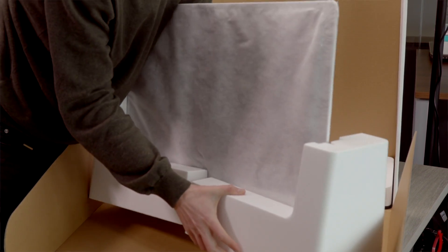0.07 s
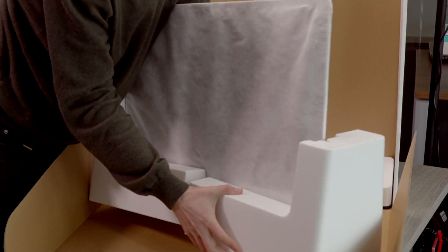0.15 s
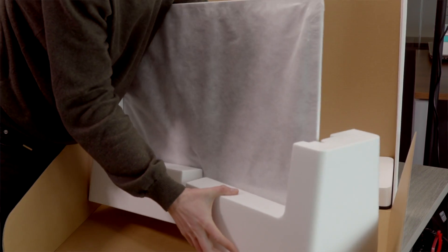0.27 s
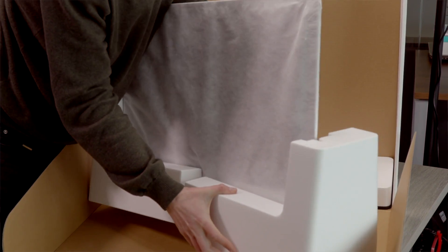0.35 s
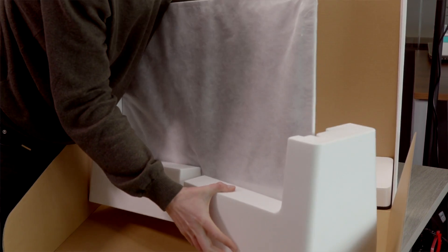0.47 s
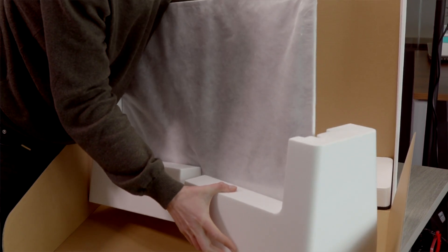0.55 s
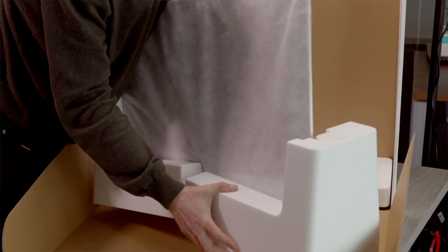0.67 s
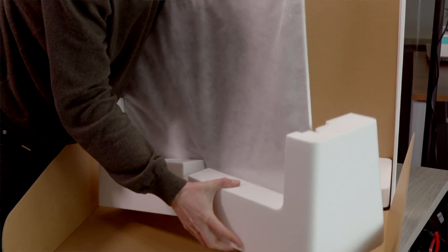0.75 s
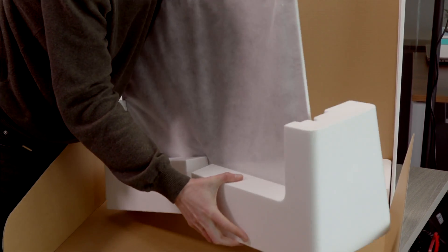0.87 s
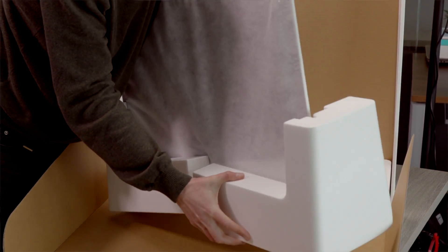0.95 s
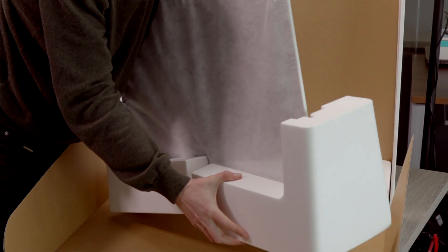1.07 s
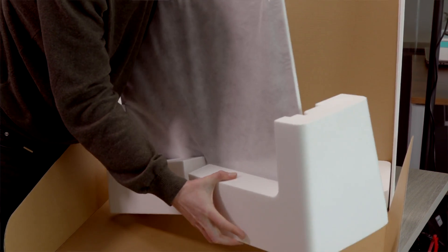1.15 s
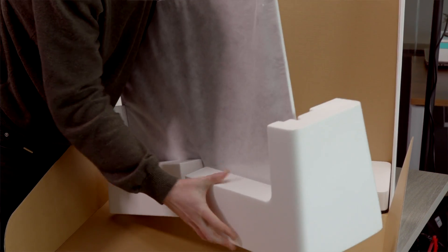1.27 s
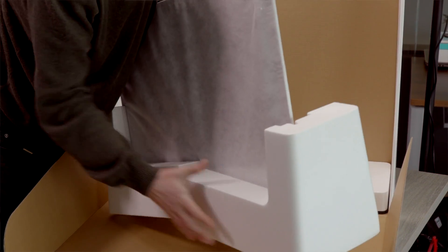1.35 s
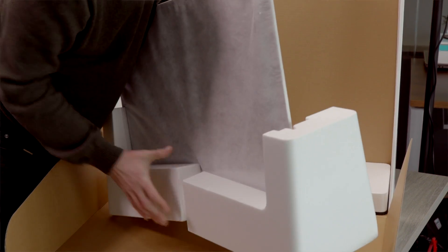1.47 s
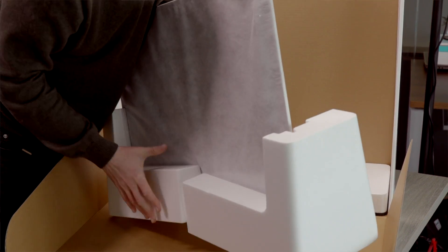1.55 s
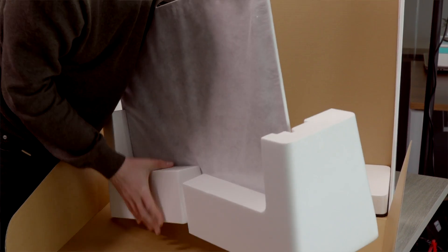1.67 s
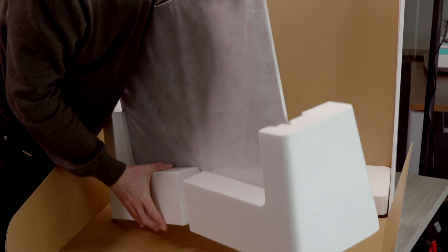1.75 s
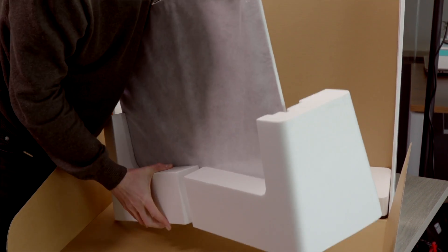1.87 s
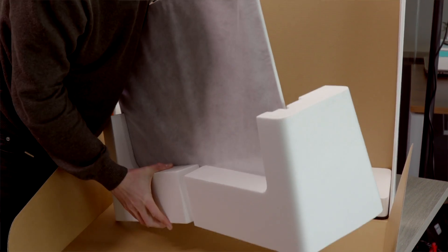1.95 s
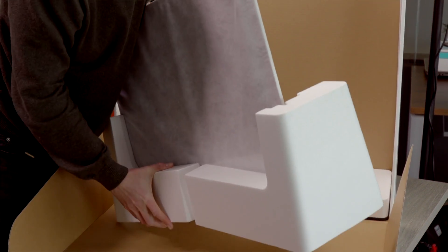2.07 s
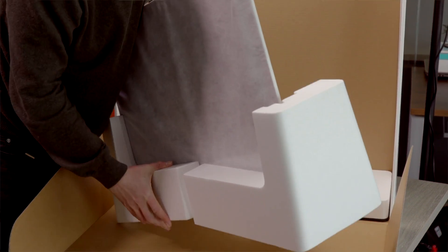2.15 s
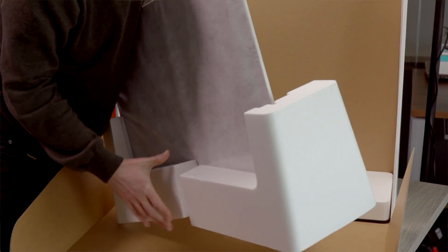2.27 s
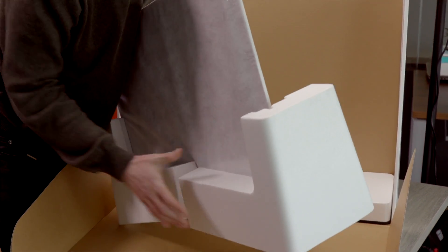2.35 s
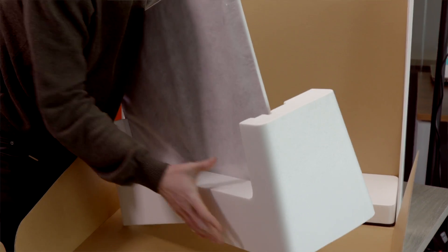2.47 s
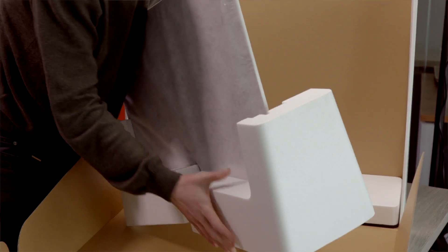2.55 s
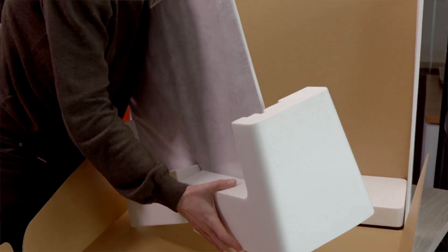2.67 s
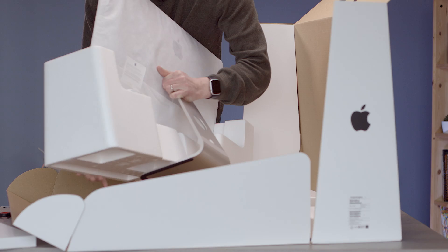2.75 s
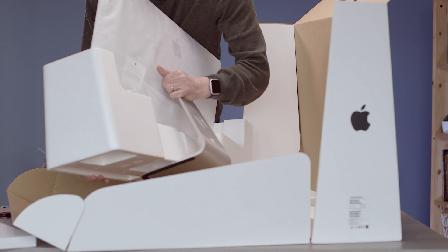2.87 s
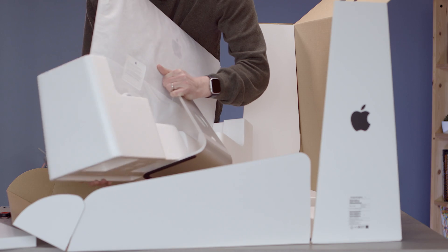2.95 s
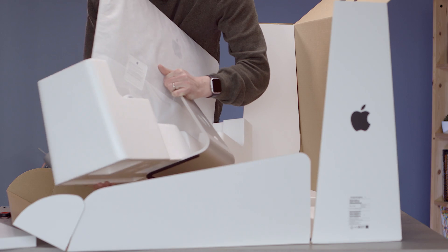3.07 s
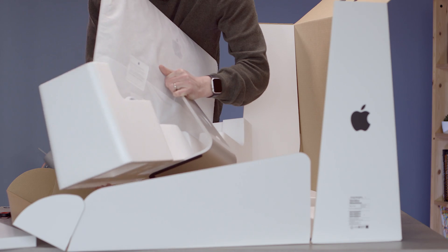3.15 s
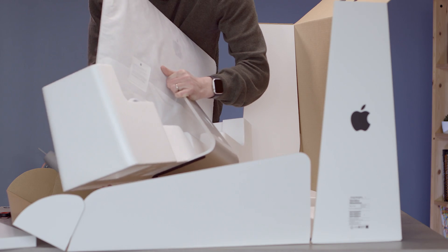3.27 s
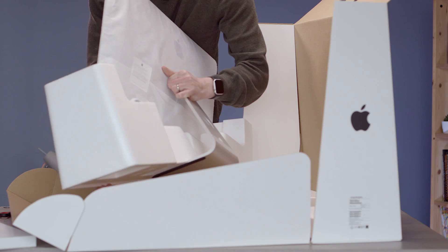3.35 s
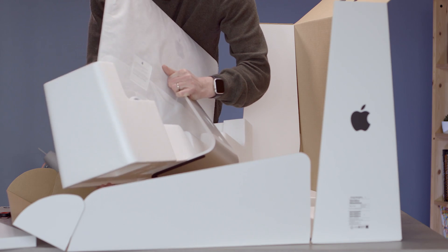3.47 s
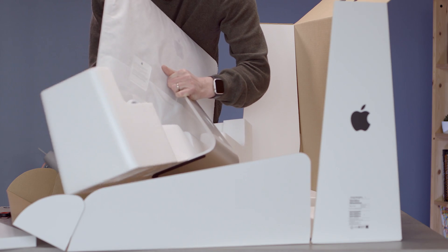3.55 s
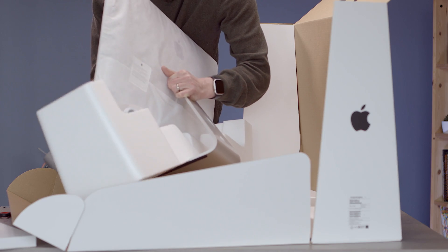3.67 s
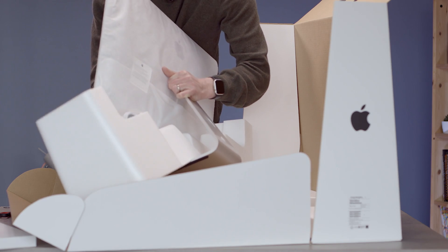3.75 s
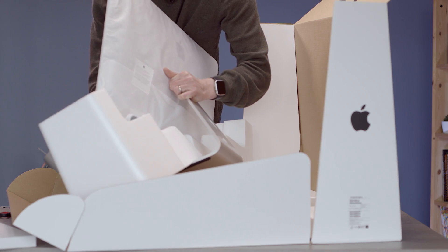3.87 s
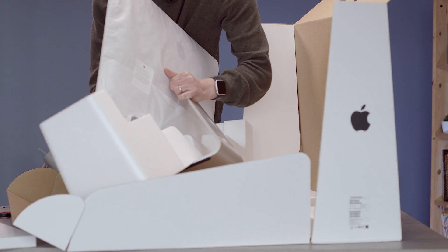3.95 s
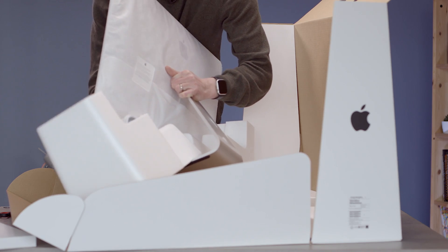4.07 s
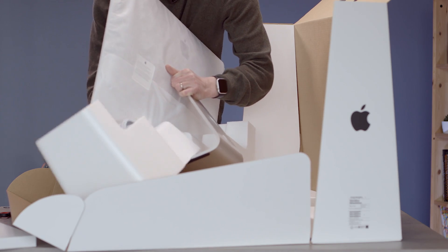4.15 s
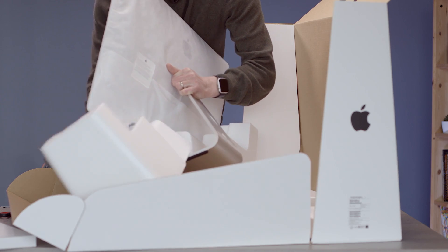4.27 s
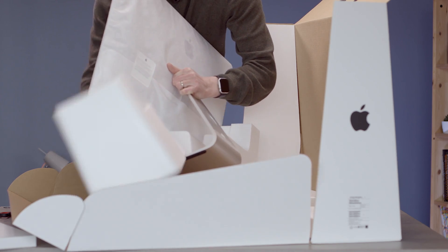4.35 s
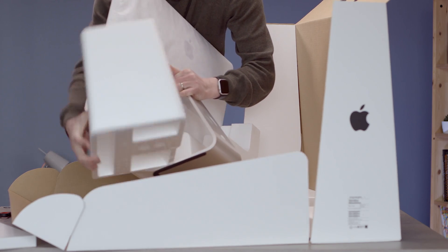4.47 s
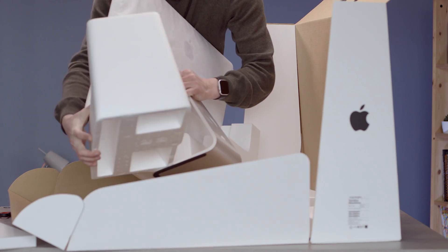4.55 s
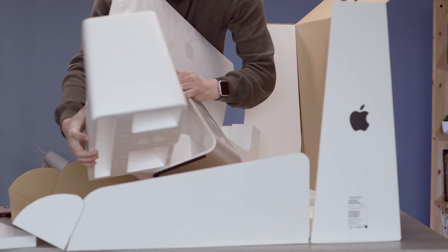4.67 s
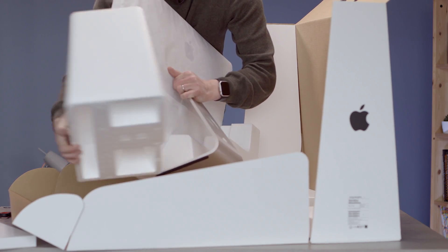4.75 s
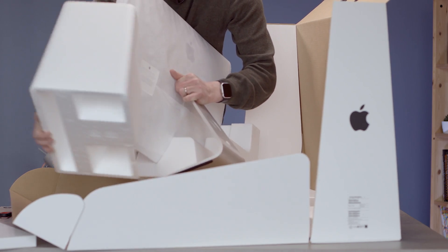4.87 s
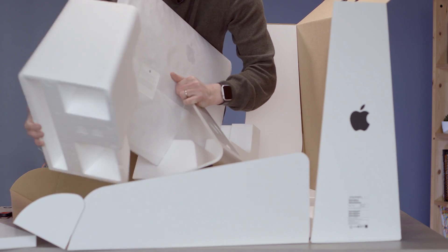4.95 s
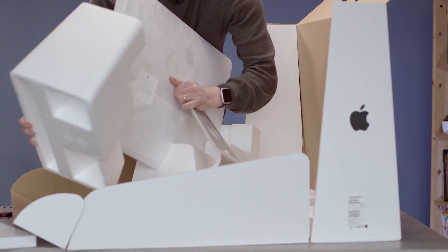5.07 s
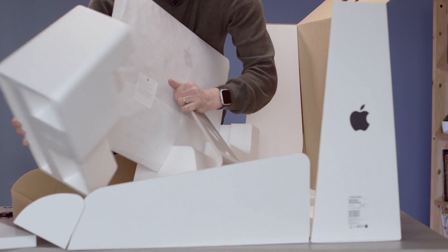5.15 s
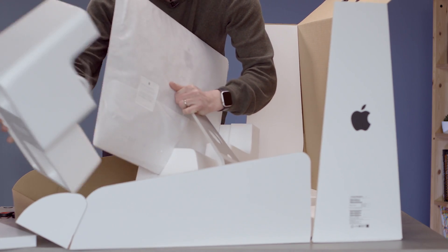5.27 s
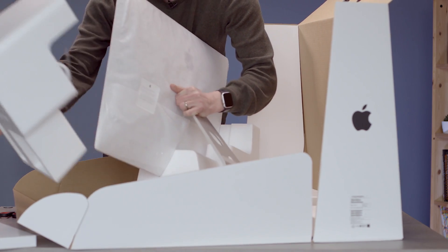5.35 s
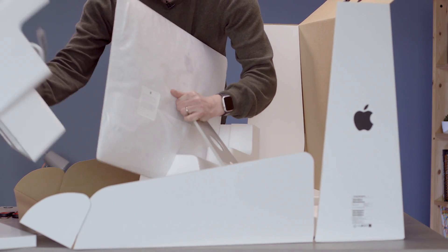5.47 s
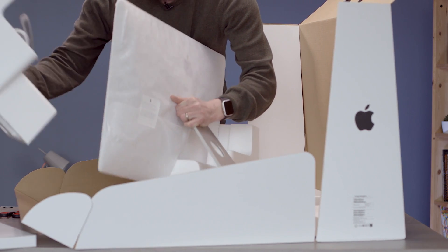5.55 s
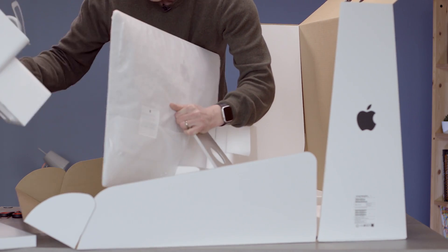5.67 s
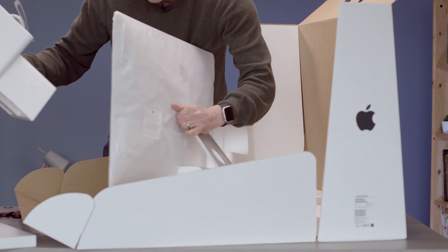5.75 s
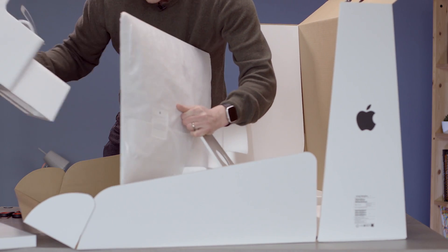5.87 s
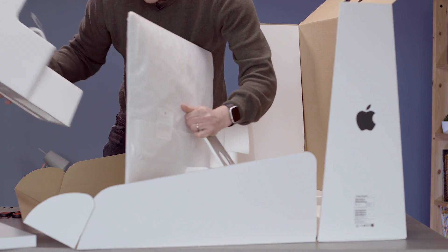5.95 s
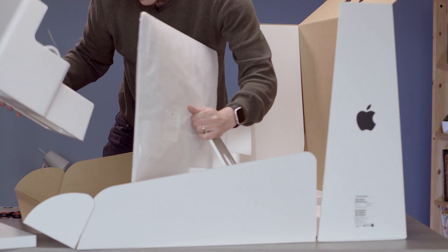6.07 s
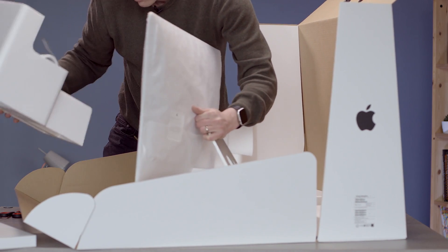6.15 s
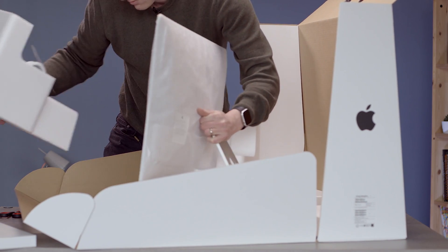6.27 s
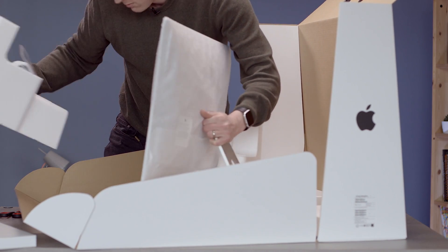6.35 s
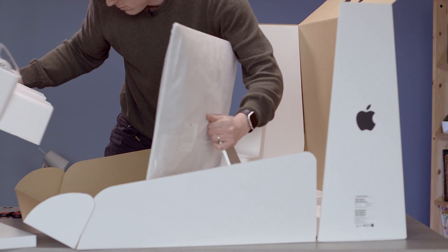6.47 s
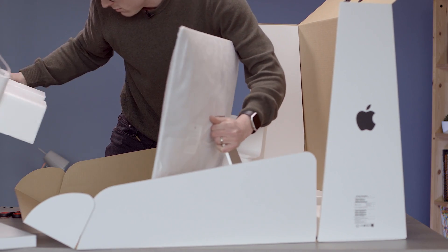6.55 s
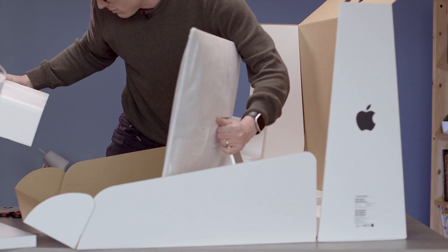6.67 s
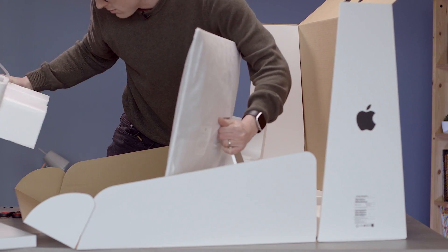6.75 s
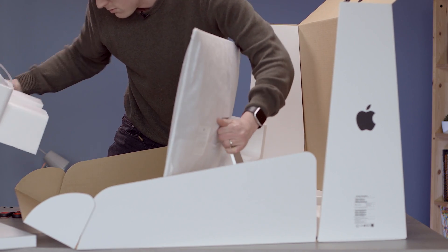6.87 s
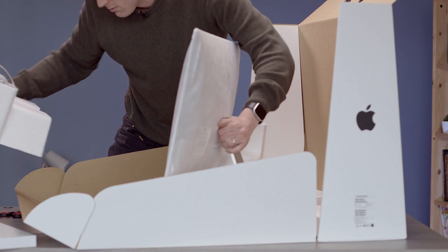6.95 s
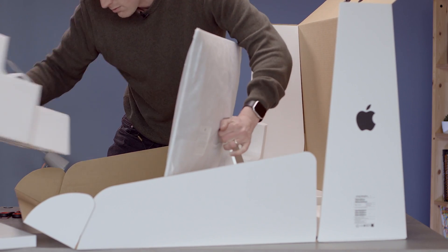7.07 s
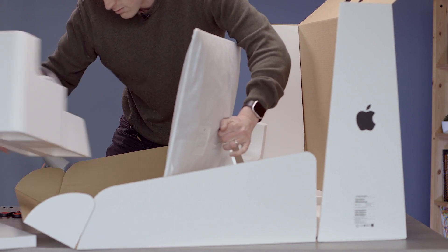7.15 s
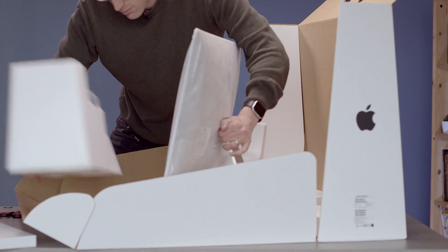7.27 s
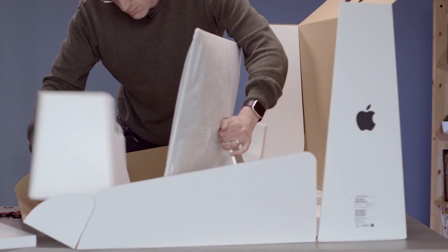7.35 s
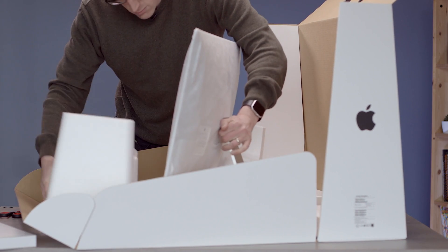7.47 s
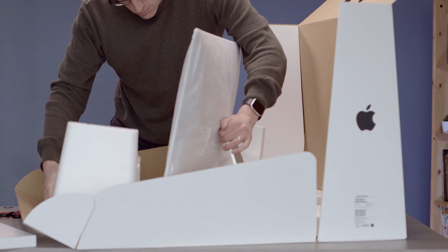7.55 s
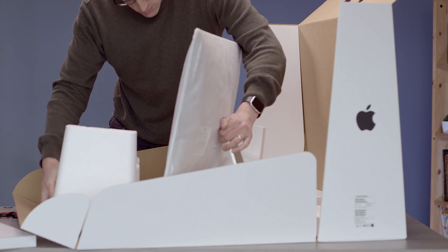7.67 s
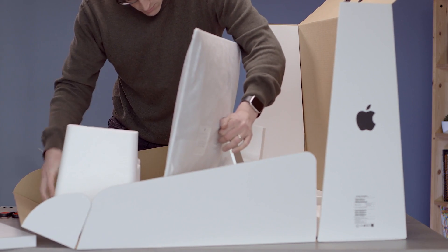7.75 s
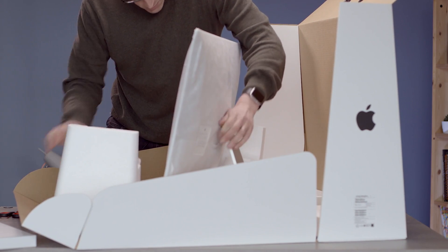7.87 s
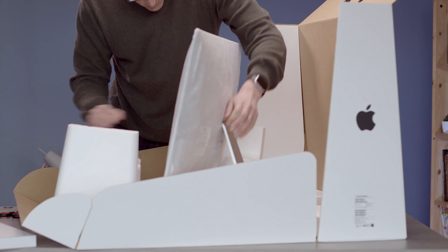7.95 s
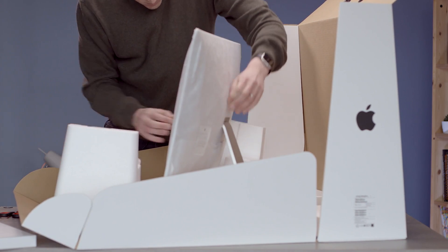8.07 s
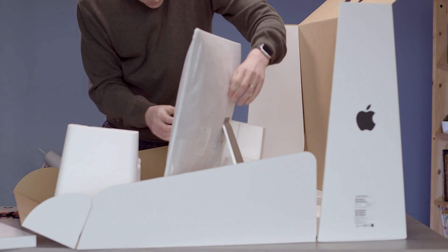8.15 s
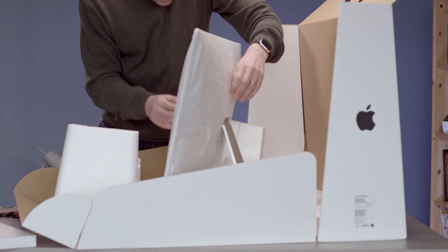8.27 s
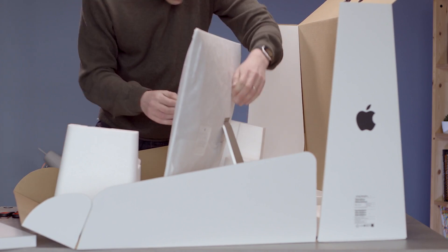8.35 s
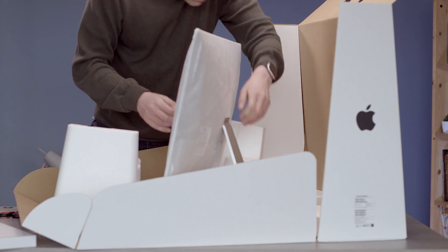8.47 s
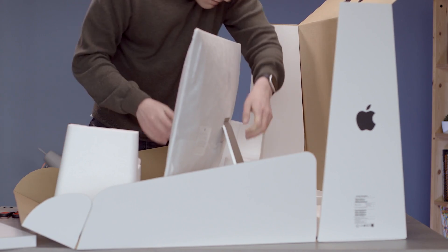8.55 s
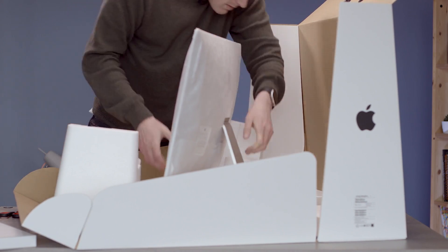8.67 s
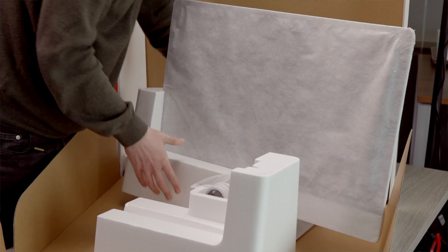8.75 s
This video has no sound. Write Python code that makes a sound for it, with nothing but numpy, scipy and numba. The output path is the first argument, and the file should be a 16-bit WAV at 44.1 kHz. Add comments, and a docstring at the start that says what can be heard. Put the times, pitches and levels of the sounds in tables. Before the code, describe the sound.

Moulded foam packing blocks scrape, squeak and knock inside a large cardboard box, peaking in a bright squealing tug, then set down with clacks.

```python
"""In a small room, moulded foam inserts are worked off a wrapped object and set down in a cardboard box.
Countless tiny random slips of the foam cells hiss, squeal and ring the hollow block.
Short bursts through resonances make the knocks and small snaps; uneven pulse trains make the judders.
Slips through broad resonances make the box panels rumble and the object's soft cloth wrap rustle.
The object's metal stand rings faintly when a block is dropped beside it, and still air lies under it all."""
import sys
import numpy as np
from scipy import signal
from scipy.fft import rfft, irfft
from scipy.io import wavfile
from scipy.ndimage import uniform_filter1d
from numba import njit

SR = 44100
rng = np.random.default_rng(int(sys.argv[2]) if len(sys.argv) > 2 else 0)


def file_out(sig):
    """Save sig as 16-bit WAV at sys.argv[1]."""
    # one column per channel
    cols = np.atleast_2d(sig).T
    # limit, then scale
    lim = np.clip(cols, -1, 1)
    pcm = np.round(lim * 32767).astype(np.int16)
    wavfile.write(sys.argv[1], SR, pcm)


N = 388945  # length in samples
T = np.arange(N) / SR  # time in seconds

# resonances of the box with the foam in it: [f/Hz, width/Hz, relative level/dB]
BOX_MODES = [(141.2, 9.8, -0.5), (182, 46, 4), (298, 43, 1), (354, 55, 7), (500, 26, 2.5), (565, 72, 1),
             (822, 21, 1), (1160, 35, -2), (1600, 110, -1.5), (1810, 65, -1.5)]
# tone colour of a dull thud: [f/Hz, relative level/dB]
THUD_COLOUR = [(40, -14.5), (110, -4), (250, 9), (1000, 5.5), (1850, 0.5), (2450, -8), (4000, -21),
               (12000, -35)]
# tone colour of cracking foam cells: [f/Hz, relative level/dB]
CRACK_COLOUR = [(800, -35.5), (2000, -5.5), (3500, 1), (6000, 1.5), (9000, -1.5), (15500, -5.5)]
# between pushes the foam creeps under the hands:
# [t/s, cell hiss level/dB, relative level of the block's drone/dB]
CREEP_LEVELS = [(0, -49, -50), (.38, -64.5, -50), (1.12, -59, -59.5), (1.42, -58, -55),
                (1.65, -69.5, -63.5), (1.82, -57, -45), (2.47, -69.5, -60.5), (2.6, -68, -62),
                (2.8, -48, -42), (3.3, -60, -52), (3.5, -62.5, -52.5), (3.85, -52.5, -48), (4.05, -59, -59),
                (4.4, -44, -42), (4.85, -53, -48.5), (5.3, -66.5, -51.5), (5.61, -64, -59),
                (5.8, -54, -45.5), (6.2, -54.5, -54), (6.28, -59.5, -55), (7.36, -74.5, -66),
                (7.7, -52, -43), (7.9, -65.5, -62), (8.08, -74.5, -68.5), (8.2, -71.5, -75.5),
                (8.35, -83.5, -82.5), (8.82, -86, -63)]

# a push gathers speed, tires while it is held, then friction stops it
SWELL_POWER, TIRE_DB_PER_S, STOP_S = 1.3, 27, 0.026


def undb(db):
    """Decibels to gain."""
    return 10 ** (np.asarray(db) / 20)


def unit(x):
    """Scale to an rms (average strength) of one."""
    return x / np.sqrt(np.mean(x ** 2) + 1e-18)


def held(x, length_s):
    """Scale a short sound to the energy of a unit rms held for length_s."""
    return x / np.sqrt(np.sum(x ** 2) / (length_s * SR) + 1e-18)


def add(track, s, sound):
    """Mix a sound into a track at time s."""
    i = max(int(s * SR), 0)
    track[i:i + len(sound)] += sound[:len(track) - i]


def curves(table):
    """Each column of a table, joined by straight lines in time."""
    s, *columns = np.transpose(table)
    return [np.interp(T, s, column) for column in columns]


def colour(x, points, size=4096):
    """Filter through (Hz, dB) points without sounding ahead of the input, built from the cepstrum."""
    hz, db = np.transpose(points)
    grid = np.maximum(np.arange(size // 2 + 1) * SR / size, 1)
    log_gain = np.log(undb(np.interp(np.log(grid), np.log(hz), db)))
    cepstrum = irfft(log_gain)
    # folding the second half onto the first makes the filter respond at once
    cepstrum[1:size // 2] *= 2
    cepstrum[size // 2 + 1:] = 0
    response = irfft(np.exp(rfft(cepstrum)))
    return signal.fftconvolve(x, response)[:len(x)]


def resonate(x, hz, width_hz):
    """One resonance with gain one at its centre."""
    b, a = signal.iirpeak(min(hz, SR / 2 - 1), hz / width_hz, fs=SR)
    return signal.lfilter(b, a, x)


def ring(x, modes):
    """A bank of resonances driven together."""
    return sum(undb(db) * resonate(x, hz, width) for hz, width, db in modes)


@njit
def sweep(x, hz, width_hz):
    """A resonance whose centre moves; gain one at the centre."""
    y, band, low = np.empty(len(x)), 0., 0.
    for i in range(len(x)):
        g, k = np.tan(np.pi * hz[i] / SR), width_hz / hz[i]
        v = (band + g * (x[i] - low)) / (1 + g * (g + k))
        band, low, y[i] = 2 * v - band, low + 2 * g * v, k * v
    return y


def walk(rate):
    """Smooth chance that changes about rate times a second; spread near one."""
    k = max(int(SR / rate), 1)
    steps = np.repeat(rng.standard_normal(N // k + 1), k)[:N]
    return unit(uniform_filter1d(steps, k))


def slips(rate, spread_db):
    """Tiny slips at random moments, rate a second, of uneven size and either sign."""
    hits = rng.random(N) < rate / SR
    signs = np.sign(rng.standard_normal(N))
    sizes = undb(spread_db * np.clip(rng.standard_normal(N), -2, 2))
    # dividing by the root of the rate keeps busy moments from growing louder
    return unit(hits * signs * sizes / np.sqrt(np.minimum(rate, SR)))


def push_shape(s, swell_s, hold_s):
    """Gain of one push: it swells, sags while held and brakes to a halt."""
    t = T - s
    swell = np.clip(t / max(swell_s, .002), 0, 1) ** SWELL_POWER
    tire = undb(-TIRE_DB_PER_S * np.maximum(t - swell_s, 0))
    brake = np.exp(-np.clip((t - swell_s - hold_s) / STOP_S, 0, 10) ** 2)
    return swell * tire * brake


def still_air(level_db=-66.5):
    """The faint steady breath of the room: noise with most of its strength in the lows."""
    # tone colour of the air: [f/Hz, relative level/dB]
    air_colour = [(20, -26), (50, -4.5), (110, 6.5), (250, -5.5), (500, -12), (1200, -6.5), (2300, -22.5),
                  (6000, -26), (15000, -29)]
    return unit(colour(rng.standard_normal(N), air_colour)) * undb(level_db)


def room(x, wet_db=-14, low_t60=0.44, high_t60=0.21, high_db=-4):
    """A small furnished room: a faint tail in which the lows last longer (t60: seconds to fall 60 dB)."""
    t = T[:SR // 2]
    low, high = rng.standard_normal((2, len(t)))
    low = colour(low, [(1200, 3.0), (3500, -1.0)]) * undb(-60 * t / low_t60)
    high = colour(high, [(1200, -11.5), (3500, -15.0)]) * undb(high_db - 60 * t / high_t60)
    onset = np.clip(t / 0.0045, 0, 1) ** 2
    tail = (low + high) * onset / np.sqrt(SR * low_t60 / np.log(10 ** 6))
    return x + undb(wet_db) * signal.fftconvolve(x, tail)[:N]


def close_reflections(x, lag_s, share, drift, count=4):
    """Close reflections off the cardboard walls; their paths change as the foam moves."""
    lags = [lag_s * (k + 1) ** 1.2 * (1 + drift * walk(1.5)) for k in range(count)]
    copies = [x[np.arange(N) - np.round(lag * SR).astype(int)] for lag in lags]
    return unit(x + share * sum(copies))


def ringing_stand():
    """A few jolts set off the metal stand's narrow resonances, which ring on faintly."""
    # jolts to the stand: [t/s, relative level/dB]
    jolts = [(7.606, -45.5), (7.645, -44), (7.675, -37.5)]
    # resonances of the stand: [f/Hz, width/Hz, relative level/dB]
    stand_modes = [(1200, 8.8, 3.5), (1416, 7.6, -1.5), (1520, 12, 3.5), (1816, 22, -3.5), (3350, 7, -5.5)]
    blows = np.zeros(N)
    for s, db in jolts:
        add(blows, s, undb([db]))
    click = 1. * (T[:SR] == 0)
    one_ring = held(ring(click, stand_modes), 0.064)
    tremble = 1 + 0.7 * walk(130)  # the ring trembles roughly
    return signal.fftconvolve(blows, one_ring)[:N] * tremble


def wrap_rubbing(peak=0.11):
    """The soft cloth wrap of the object rubs: slips rustle in strokes that swell quickly and trail off."""
    # strokes of the wrap: [t/s, length/s, peak level/dB]
    wrap_strokes = [(2.971, 0.082, -38.5), (5.975, 0.2, -44), (6.646, 0.17, -45.5)]
    # resonances of the cloth wrap: [f/Hz, width/Hz, relative level/dB]
    wrap_modes = [(660, 110, 5.5), (1280, 260, 10.5), (1777, 63, 16.5)]
    speed = np.zeros(N)
    for s, length, db in wrap_strokes:
        # peak is the share of the stroke spent swelling
        speed += undb(db) * np.interp(T, [s, s + peak * length, s + length], [0, 1, 0])
    return speed * unit(ring(slips(rate=4400, spread_db=5.5), wrap_modes))


def flexing(creep_rumble_db=-6, panel_db=-3.5):
    """Broad cardboard panels rumble as the load bends them, and faintly while the foam creeps."""
    # bends of a panel: [t/s, swell/s, hold/s, relative level/dB]
    bends = [(1.32, 0.055, 0.03, -40.5), (1.83, .025, 0.013, -39), (2.162, 0.044, 0.076, -38.5),
             (4.33, 0.055, 0.38, -39), (4.923, 0.012, 0.016, -28), (5.65, 0.036, 0.066, -35),
             (6.698, .12, 0.14, -51.5), (7.448, 0.022, 0.08, -31.5)]
    # tone colour of the panels: [f/Hz, relative level/dB]
    panel_colour = [(50, -23.5), (80, -12), (130, 2), (190, -8.5), (280, -5), (600, -45.5)]
    _, creep_drone_db = curves(CREEP_LEVELS)
    power = undb(creep_drone_db + creep_rumble_db) ** 2
    for s, swell, hold, db in bends:
        power = power + (undb(db) * push_shape(s, swell, hold)) ** 2
    load = slips(rate=500, spread_db=1.5)
    rumble = unit(colour(load + ring(load, BOX_MODES), panel_colour))
    return rumble * np.sqrt(power) * undb(panel_db)


def squealing(width_hz=750):
    """Under the hardest squeeze a thin squeal swells and fades: noise through two resonances at one pitch."""
    # squeals of hard-squeezed foam: [t/s, length/s, relative level/dB, f/Hz]
    squeals = [(4.201, 0.072, -26, 7900), (4.245, 0.035, -20, 10600), (4.292, 0.085, -23.5, 12100),
               (6.005, 0.066, -37, 12300)]
    out, t = np.zeros(N), T[:SR // 2]
    for s, length, db, hz in squeals:
        narrow = resonate(rng.standard_normal(len(t)), hz, width_hz)
        tone = resonate(narrow, hz, 2 * width_hz)
        swell = np.sin(np.pi * np.minimum(t / length, 1))
        add(out, s, undb(db) * unit(tone) * swell)
    return out


def snapping(width=0.093, fade_s=0.0011, crack_db=-4):
    """Tiny fading noise bursts, each with a pitch of its own: bead snaps and a squeak's bright overtone."""
    # small snaps of foam beads, and at 1.71 the bright overtone of a short squeak:
    # [t/s, level/dB, ring f/Hz]
    snaps = [(0.522, -44, 7000), (1.192, -37, 3950), (1.274, -38, 4200), (1.711, -33, 2950),
             (1.722, -32, 3070), (2.173, -42.5, 6000), (8.53, -64, 5000)]
    out, t = np.zeros(N), T[:SR // 20]
    for s, db, hz in snaps:
        burst = rng.standard_normal(len(t)) * np.exp(-t / fade_s)
        pitch = unit(resonate(burst, hz, width * hz))
        crack = unit(colour(burst, CRACK_COLOUR))
        snap = pitch + undb(crack_db) * crack
        add(out, s, undb(db) * held(snap, 2 * fade_s))
    return out


def juddering(jitter=0.2, wander=0.046, spread_db=3.0, damping=0.39, box_db=-5, rise=0.59, fade=0.21):
    """Uneven pulses, about one per swing of a resonance, build up short groans and rings."""
    # stick-slip judders, and two short rings: one opening the knock at 5.65,
    # one of the box after the knock at 7.815:
    # [t/s, length/s, groan level/dB, ring f/Hz, grit level/dB]
    judders = [(0.503, 0.026, -28, 488.5, -47), (1.212, 0.029, -29.5, 546, -39.5),
               (1.712, 0.0074, -21.5, 1602, -40), (1.723, 0.0067, -24, 1570, -40),
               (1.737, 0.026, -34, 326, -51), (2.2, 0.021, -32, 575, -57), (2.747, 0.02, -25, 507, -39),
               (2.829, 0.031, -26, 300, -41), (3.319, 0.0099, -33.5, 660, -52),
               (3.338, 0.055, -38.5, 415, -64), (4.511, 0.083, -34.5, 379, -53),
               (4.946, 0.024, -33.5, 500, -55), (5.644, 0.004, -25, 990, -56),
               (5.708, 0.032, -29, 174.5, -40.5), (7.474, 0.049, -27.5, 212, -67),
               (7.462, 0.05, -29.5, 576, -56), (7.573, 0.024, -33.5, 584, -45),
               (7.822, 0.058, -50.5, 440, -70)]
    out, t, swings = np.zeros(N), T[:SR // 4], np.arange(128)
    for s, length, groan_db, hz, grit_db in judders:
        early, drift, size = rng.standard_normal((3, len(swings)))
        times = np.abs(swings + jitter * early + wander * np.cumsum(drift)) / hz
        # the pulses grow over the first swings, then the strain is spent
        growth = 1 - np.exp(-(swings + 1) / rise)
        strain = growth * np.clip(1 - times / length, 0, 1) ** fade
        sizes = strain * undb(spread_db * size)
        train = np.bincount((times * SR).astype(int), sizes, len(t))[:len(t)]
        swing = resonate(train, hz, damping * hz)
        groan = colour(swing + undb(box_db) * ring(swing, BOX_MODES), THUD_COLOUR)
        # each pulse sets off a gritty noise that dies away in about 1.7 ms
        tear = signal.lfilter([1], [1, -np.exp(-1 / (0.0017 * SR))], train)
        grit = colour(tear * rng.standard_normal(len(t)), CRACK_COLOUR)
        add(out, s, undb(groan_db) * held(groan, length) + undb(grit_db) * held(grit, length))
    return out


def knocking(scatter=0.097, scatter_s=0.0086, damping=0.58, direct_db=-9, box_db=-3.0,
             crack_s=0.005, repeat_s=0.004236, repeat=0.24):
    """A blow rings the struck spot and the box, and is heard again about 4 ms later, as if off the table."""
    # knocks: [t/s, thud level/dB, ring of the struck spot f/Hz, crack level/dB]
    knocks = [(0.254, -49, 510, -53), (0.323, -39, 594, -42), (0.88, -39, 500, -35), (1.178, -43, 553, -44),
              (1.242, -31, 505, -32), (1.255, -28.5, 506, -28), (1.311, -39, 500, -32.5),
              (1.328, -33, 427, -32), (1.343, -37.5, 440, -33), (1.851, -34, 315, -34),
              (2.272, -37.5, 905, -28), (2.296, -40, 520, -34), (2.787, -35.5, 800, -36),
              (2.836, -31.5, 404, -47), (2.876, -27, 340, -33.5), (2.924, -39, 480, -33),
              (3.464, -43, 640, -46), (3.909, -50, 720, -45), (4.308, -34, 534, -44),
              (4.618, -34.5, 405, -52), (4.95, -37, 218, -48), (5.018, -30, 855, -34.5),
              (5.08, -32.5, 710, -33), (5.65, -32, 443, -48), (6.904, -46.5, 258, -52),
              (7.316, -57.5, 895, -66), (7.453, -24, 346, -43), (7.483, -30, 300, -60),
              (7.604, -30, 531, -27.5), (7.645, -33, 1110, -21.5), (7.676, -24, 1280, -33),
              (7.775, -42.5, 480, -42), (7.815, -38.5, 500, -41), (8.506, -60, 601, -65)]
    out, t = np.zeros(N), T[:SR // 4]
    for s, thud_db, hz, crack_db in knocks:
        spread, crush = rng.standard_normal((2, len(t)))
        blow = (t == 0) + scatter * spread * np.exp(-t / scatter_s)
        push = colour(blow, [(2.1 * hz, 0), (10 * hz, -24)])  # a softer, lower spot pushes for longer
        spot = resonate(blow, hz, damping * hz) + undb(direct_db) * push
        thud = colour(spot + undb(box_db) * ring(spot, BOX_MODES), THUD_COLOUR)
        add(thud, repeat_s, repeat * thud)  # the fainter repeat
        crack = colour(crush * np.exp(-t / crack_s), CRACK_COLOUR)  # cells crack at the contact
        add(out, s, undb(thud_db) * held(thud, 0.02) + undb(crack_db) * held(crack, 0.0036))
    return out


def sliding(creep_tight_db=-5, creep_waver_db=3.5):
    """Power of the loose hiss, the tight squeal and the drone: pushes on top of a wavering creep."""
    # pushes that slide the foam: [t/s, swell/s, hold/s, cell hiss level/dB,
    # relative level of the block's drone/dB, tight squeal over loose hiss/dB]
    strokes = [(0, 0.0017, 0.096, -39.5, -39.5, -6.5), (0.107, 0.032, 0.19, -48, -41.5, -20.5),
               (0.385, 0.046, 0.1, -50, -39.5, -18), (0.604, 0.12, 0.12, -36.5, -34.5, -4.5),
               (0.92, 0.047, 0.027, -39.5, -42, -3), (1.043, 0.019, 0.0042, -46, -42.5, -9),
               (1.166, 0.058, 0.03, -48.5, -32.5, -22.5), (1.297, 0.055, 0.034, -44.5, -35, -19),
               (1.684, 0.025, 0.035, -34, -30, 4.5), (1.756, 0.077, 0.048, -38.5, -38.5, -8.5),
               (1.867, 0.053, 0.011, -32, -37, -0.5), (2.029, 0.037, 0.014, -50.5, -46, -7),
               (2.137, 0.12, 0.036, -41, -34.5, -3.5), (2.308, 0.02, 0.067, -48, -47, -3.5),
               (2.615, 0.026, 0.062, -32.5, -35.5, 5.5), (2.728, 0.021, 0.0091, -37, -33.5, -4),
               (2.897, 0.033, 0.091, -40.5, -32, -16.5), (3.114, 0.058, 0.056, -55.5, -42.5, -11.5),
               (3.345, 0.053, 0.02, -47.5, -41, -21), (3.544, 0.071, 0.093, -32, -27.5, -27.5),
               (3.704, 0.033, 0.088, -37.5, -29, -1.5), (3.937, 0.014, 0.024, -36.5, -29.5, -6),
               (4.073, 0.024, 0.06, -40, -32, -8.5), (4.078, 0.1, 0.067, -24, -29, -2.5),
               (4.238, 0.015, 0.091, -21.5, -44, 26), (4.349, 0.043, 0.083, -30.5, -39, 13.5),
               (4.458, 0.055, 0.019, -23, -30, 20), (4.659, 0.056, 0.032, -26.5, -38, 10.5),
               (4.862, 0.011, 0.01, -32.5, -34, 1), (4.937, 0.013, 0.038, -40, -33, -2),
               (5.014, 0.023, 0.12, -46, -45, -9), (5.171, 0.022, 0.045, -42, -40.5, -13.5),
               (5.66, 0.048, 0.069, -37, -42.5, -7), (5.835, 0.022, 0.063, -39.5, -42, -3.5),
               (5.984, 0.035, 0.023, -37, -57, 8.5), (6.048, 0.025, 0.059, -45.5, -73, 6),
               (6.333, 0.071, 0.0067, -47.5, -56, 3), (6.429, 0.053, 0.044, -53.5, -71, 4),
               (6.62, 0.036, 0.098, -43.5, -46.5, 4), (6.778, 0.03, 0.15, -55.5, -57, 2.5),
               (6.908, 0.023, .12, -52.5, -54.5, 0.5), (7.332, 0.094, 0.044, -49, -51.5, 5),
               (7.517, 0.027, .05, -59, -36.5, -6), (7.595, 0.026, 0.015, -29, -29, -4),
               (7.662, 0.011, 0.029, -45.5, -40.5, -5.5), (7.926, 0.04, 0.022, -58, -67, -2)]
    creep_hiss_db, creep_drone_db = curves(CREEP_LEVELS)
    waver = undb(creep_waver_db * walk(13))
    moves = [(waver, creep_hiss_db, creep_drone_db, creep_tight_db)]
    for s, swell, hold, *levels in strokes:
        moves.append((push_shape(s, swell, hold), *levels))
    loose = tight = drone = 0
    for shape, hiss_db, drone_db, tight_db in moves:
        power = (shape * undb(hiss_db)) ** 2
        tight_share = 1 / (1 + undb(-tight_db) ** 2)
        loose = loose + (1 - tight_share) * power
        tight = tight + tight_share * power
        drone = drone + (shape * undb(drone_db)) ** 2
    return loose, tight, drone


def rubbing(block_db=-3):
    """Foam cells slip faster the harder they are rubbed; slips hiss and also shake the hollow block."""
    # tone colour of the slipping cells: [f/Hz, relative level/dB]
    hiss_colour = [(900, -22.5), (1800, 1.5), (2100, 1.5), (2650, -4.5), (3300, -1), (4500, 0), (6300, 2),
                   (8000, 3), (11000, 3.5), (13000, 1.5), (15700, -6)]
    # tone colour of the hollow block: [f/Hz, relative level/dB]
    block_colour = [(100, -30), (220, -1), (330, 3.5), (520, 3.5), (750, 4.5), (1100, 4.5), (1450, 3.5),
                    (1800, -3), (2500, -15.5), (5000, -38)]
    loose_power, tight_power, drone_power = sliding()
    hiss_db = 10 * np.log10(loose_power + tight_power)
    catch = walk(170)  # the surface catches and lets go unevenly

    rate = 12000 * undb(.4 * (hiss_db + 40.0))  # slips a second
    loose_slips = colour(slips(rate, spread_db=2.0), hiss_colour)
    loose = unit(colour(loose_slips, [(5000, -1.0), (15000, -10)]))
    # a tight contact moves the energy up into the squeal of the cell walls
    tight_slips = colour(slips(rate, spread_db=4.5), hiss_colour)
    tight = unit(colour(tight_slips, [(2500, -15.5), (6000, -3.5), (10500, 2.0)]))
    share = tight_power / (loose_power + tight_power)
    hiss = (np.sqrt(1 - share) * loose + np.sqrt(share) * tight) * undb(1.43 * catch)
    # whole beads let go less often and stand out as a crackle
    crackle = unit(colour(slips(rate=200, spread_db=1.5), CRACK_COLOUR))
    hiss = hiss + undb(-16) * crackle

    push = slips(rate=2000, spread_db=1.3) * undb(1.9 * catch)
    block = colour(push + undb(-6.0) * ring(push, BOX_MODES), block_colour)
    # the rubbed spot rings higher the faster the foam slides, and wanders as the contact travels
    spot_hz = 1500 * loose_power ** 0.089 * np.exp(0.21 * walk(22))
    block = .5 * block + sweep(block, spot_hz, 380.0)

    hiss = close_reflections(hiss, lag_s=.0011, share=0.31, drift=.1)
    block = close_reflections(block, lag_s=.0024, share=0.26, drift=0.136)
    return hiss * undb(hiss_db) + block * np.sqrt(drone_power) * undb(block_db)


def scene():
    """All the handling in the room, over still air."""
    handling = ringing_stand() + wrap_rubbing() + flexing() + squealing()
    handling = handling + snapping() + juddering() + knocking() + rubbing()
    return (room(handling) + still_air())[None]


def record(dry, top_hz=15800):
    """The recorder cuts the top: a steep filter removes what lies above top_hz."""
    low_pass = signal.ellip(10, .2, 80, top_hz, fs=SR, output="sos")
    return signal.sosfilt(low_pass, dry)


dry = scene()
out = record(dry)
file_out(out)
```